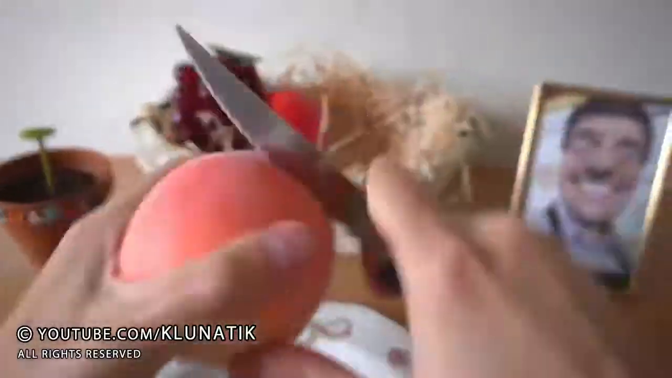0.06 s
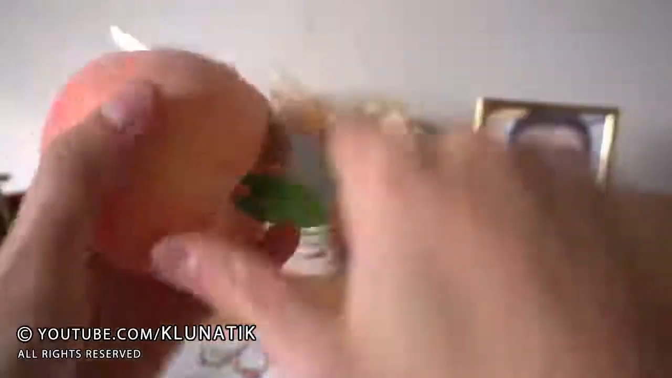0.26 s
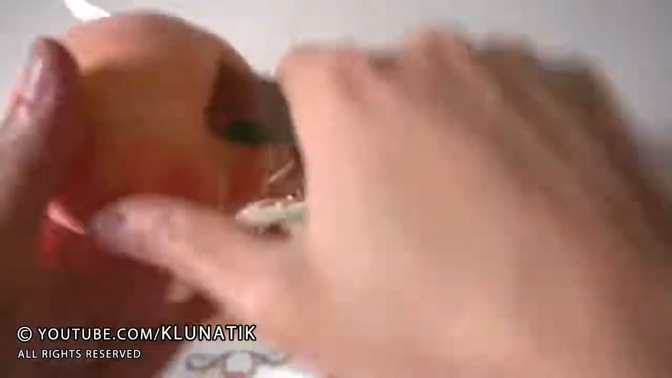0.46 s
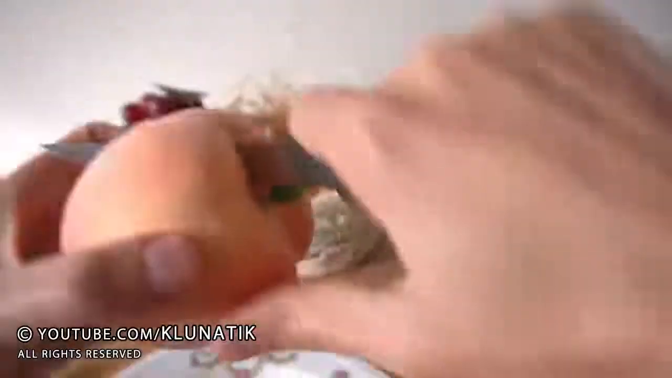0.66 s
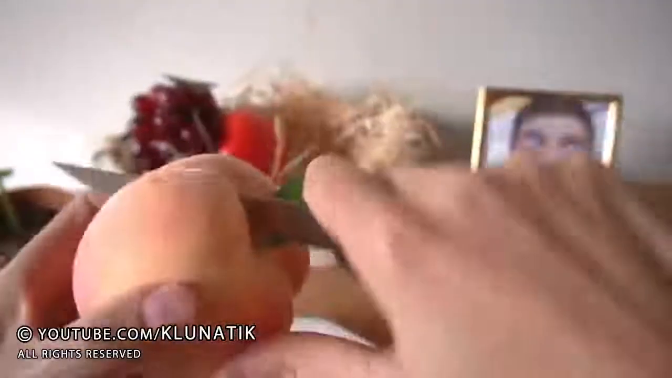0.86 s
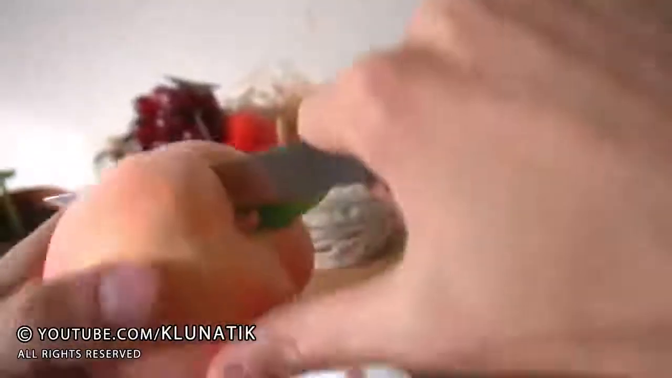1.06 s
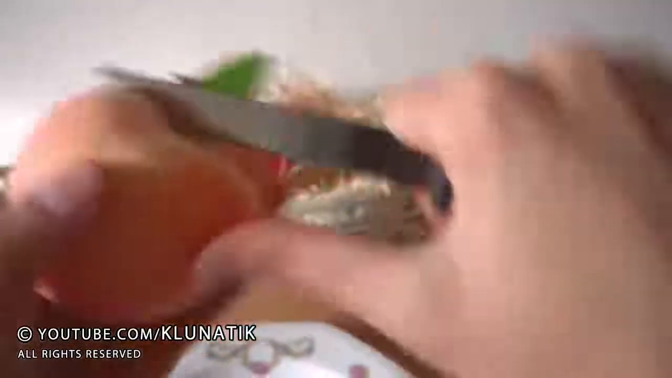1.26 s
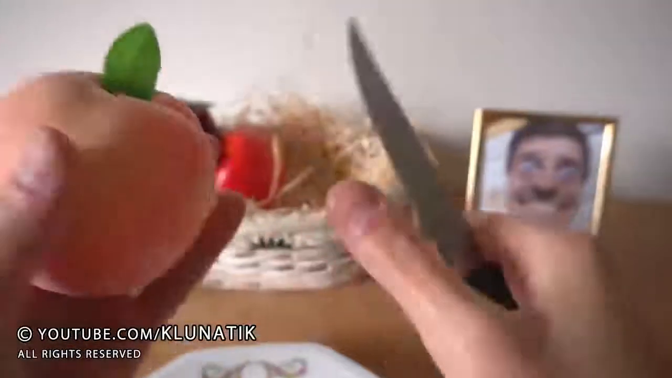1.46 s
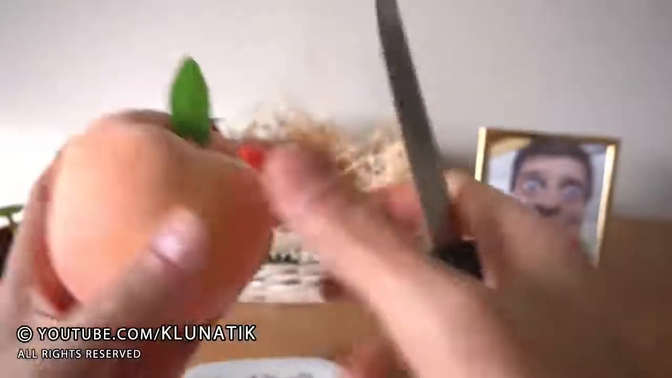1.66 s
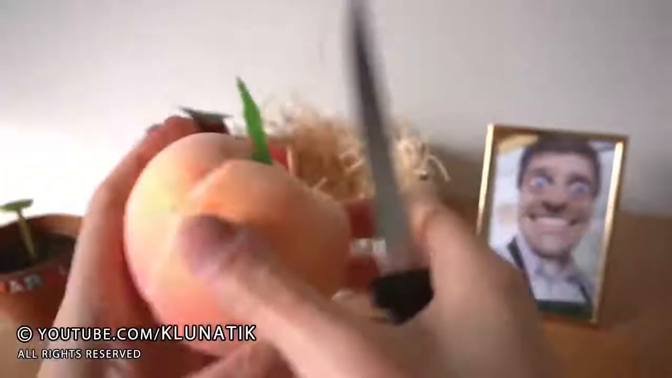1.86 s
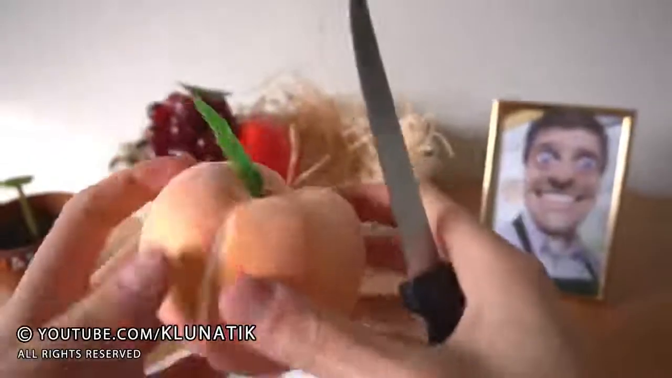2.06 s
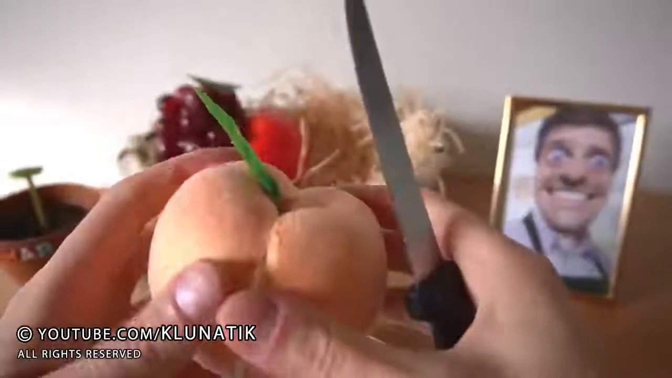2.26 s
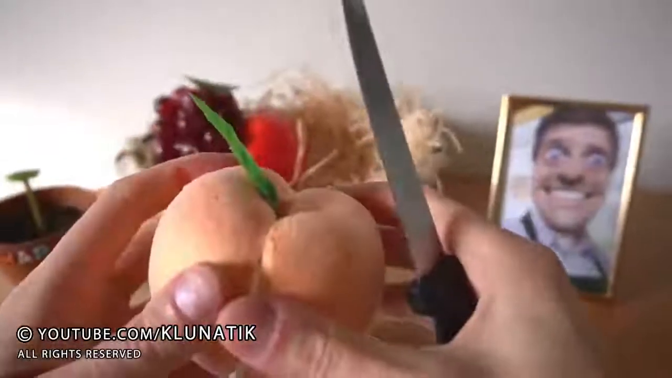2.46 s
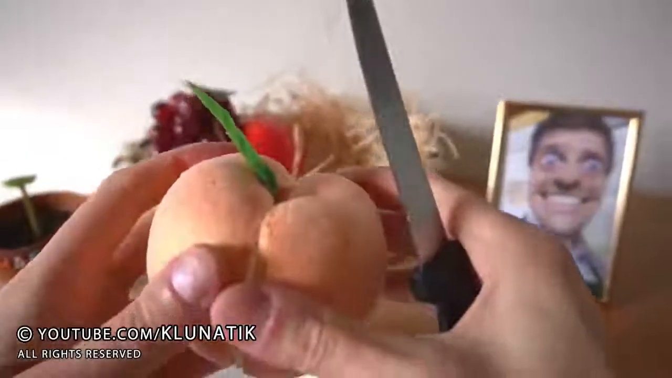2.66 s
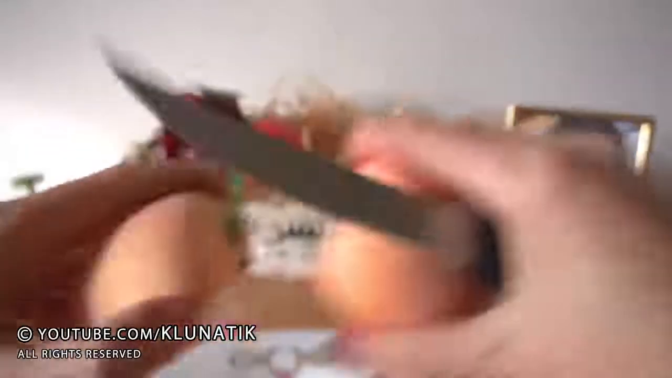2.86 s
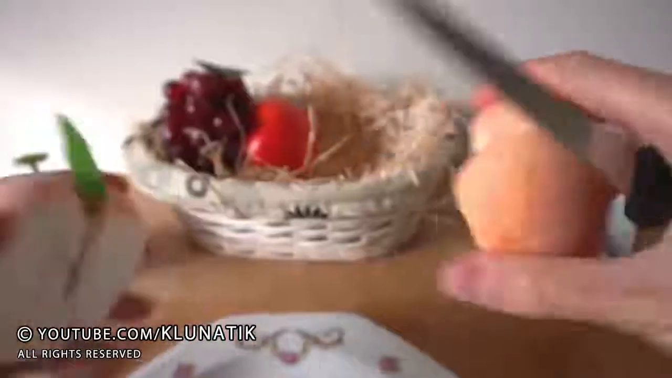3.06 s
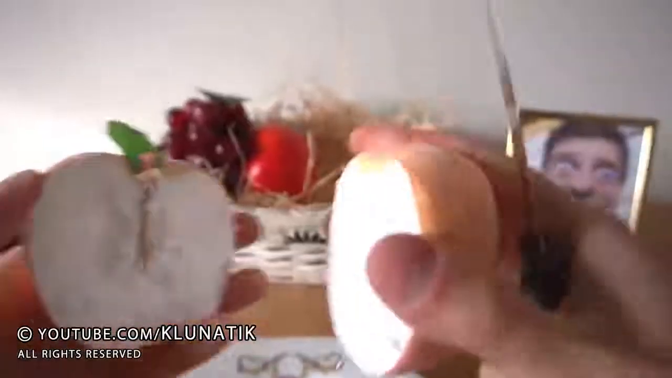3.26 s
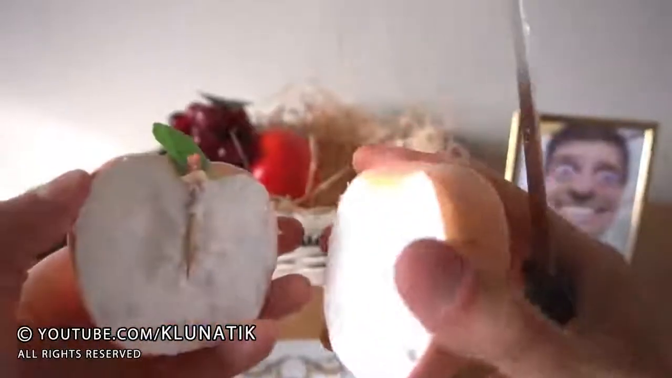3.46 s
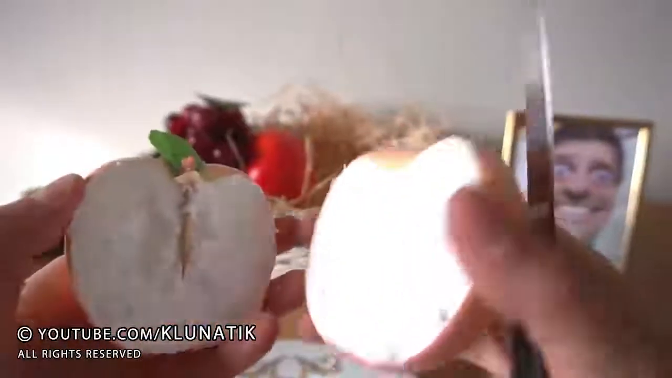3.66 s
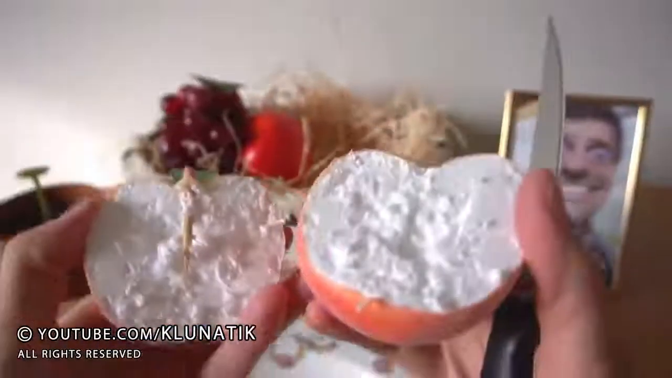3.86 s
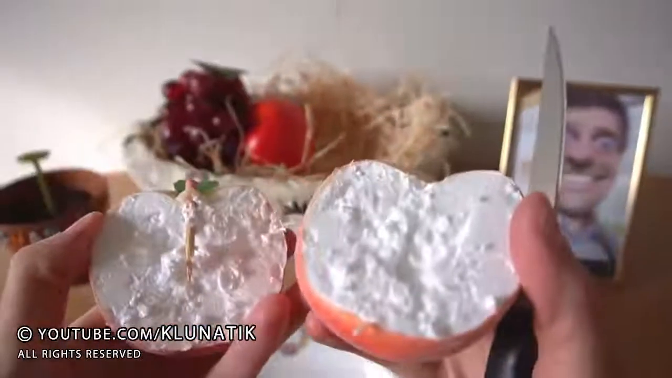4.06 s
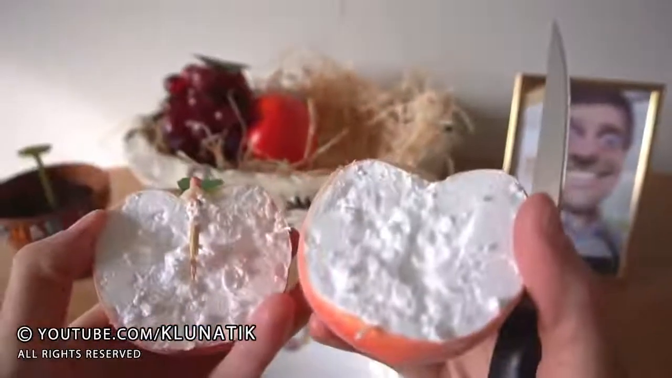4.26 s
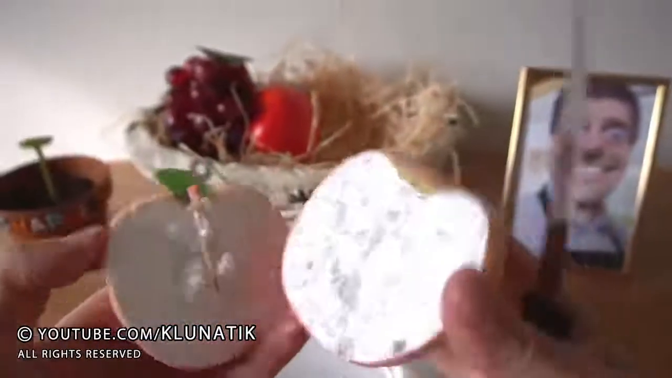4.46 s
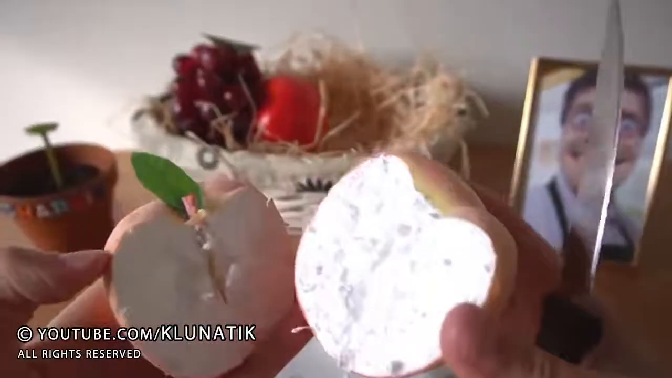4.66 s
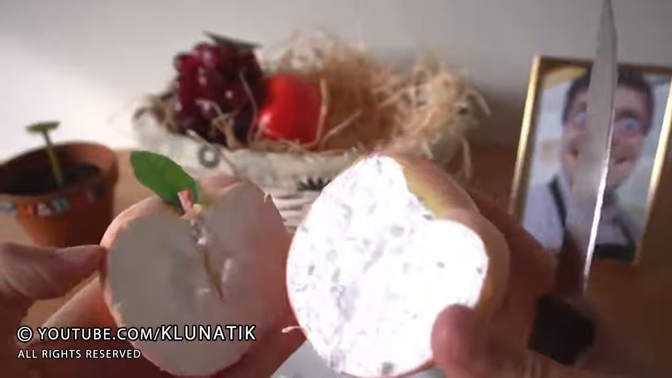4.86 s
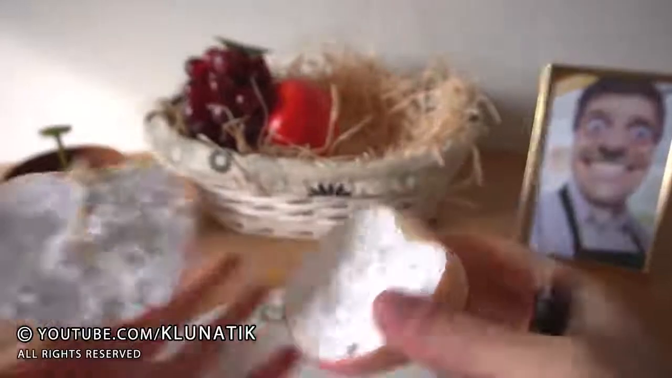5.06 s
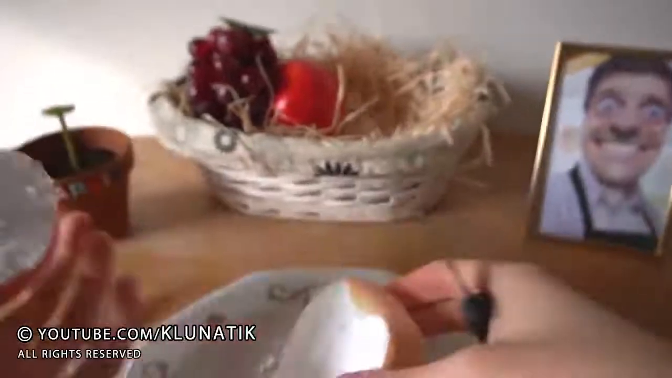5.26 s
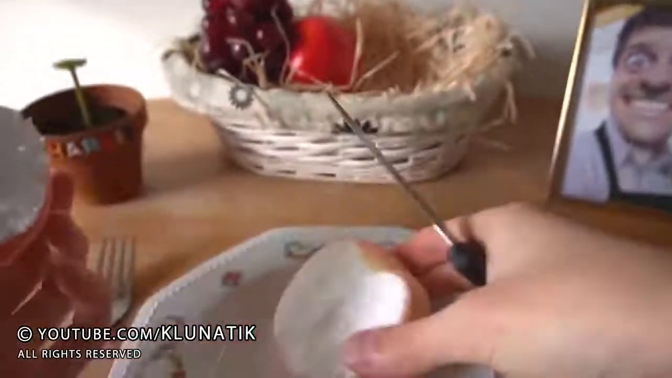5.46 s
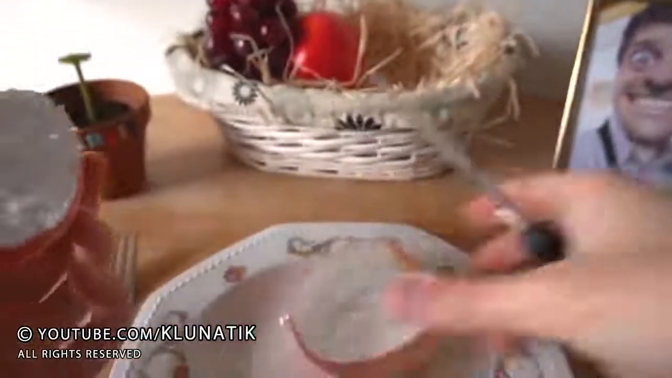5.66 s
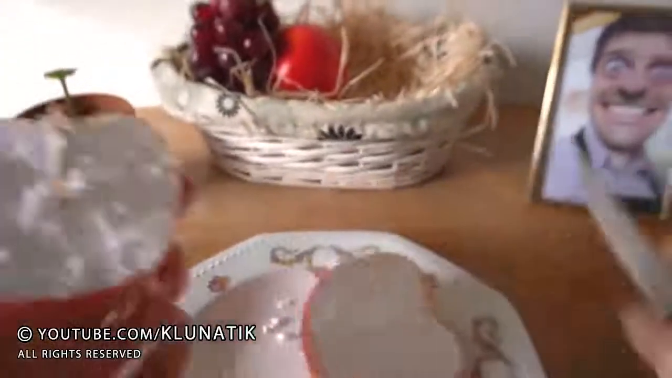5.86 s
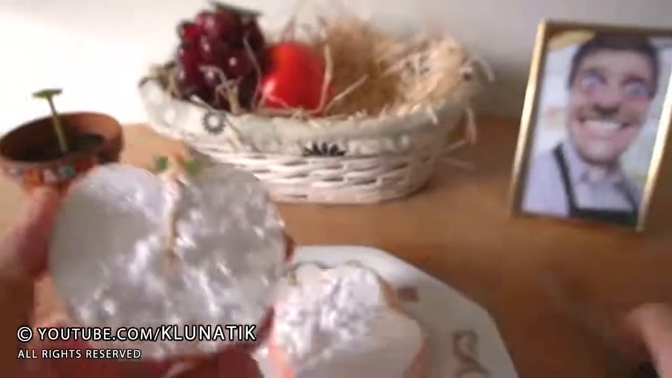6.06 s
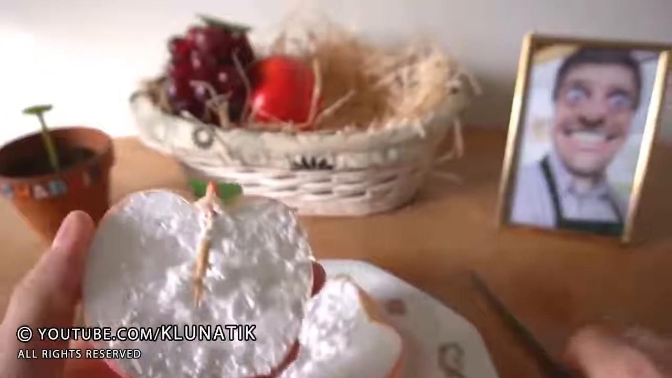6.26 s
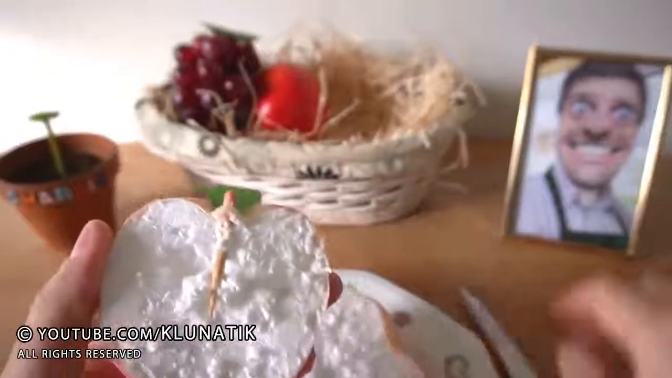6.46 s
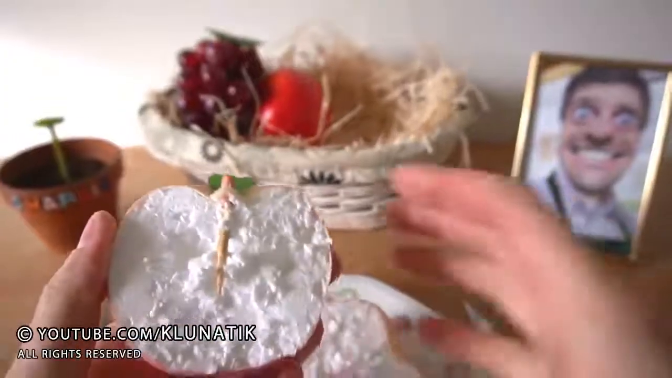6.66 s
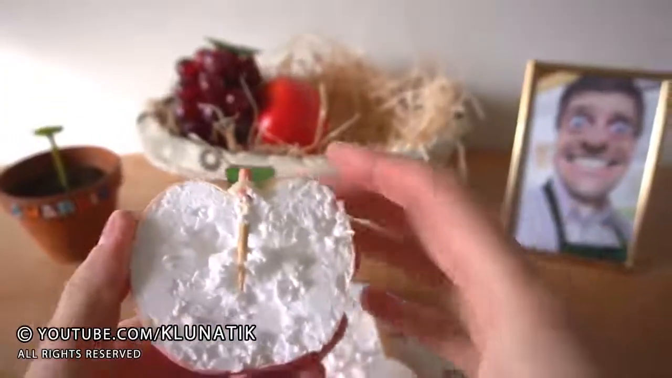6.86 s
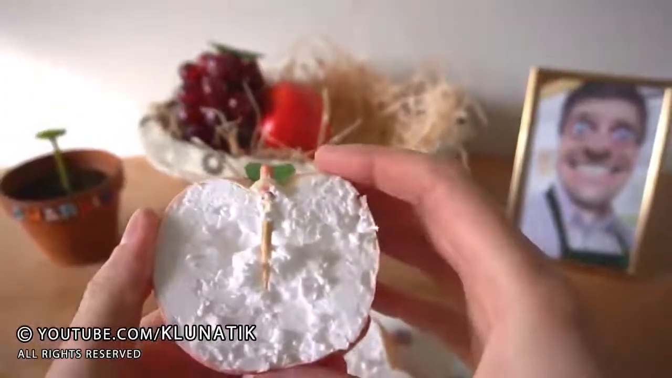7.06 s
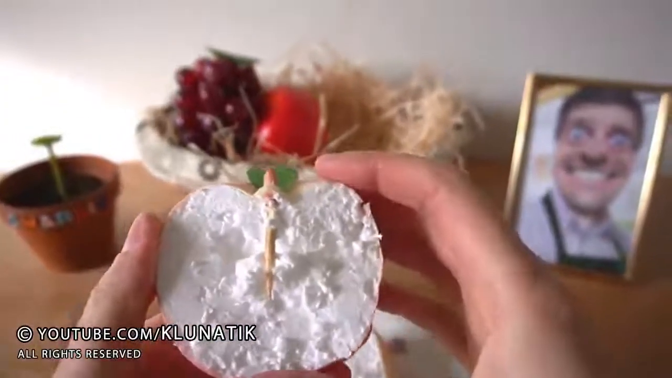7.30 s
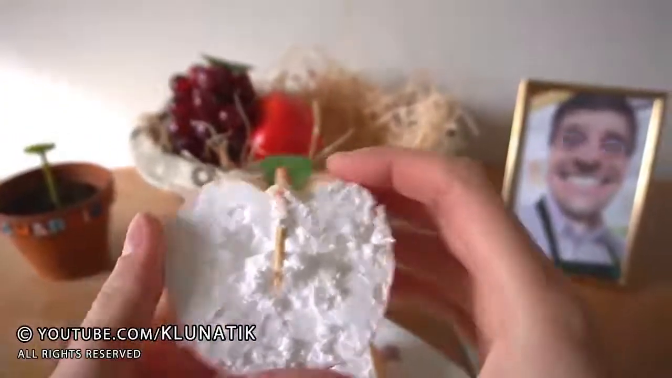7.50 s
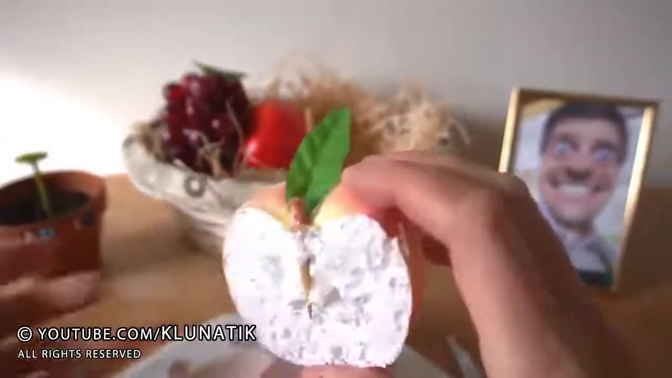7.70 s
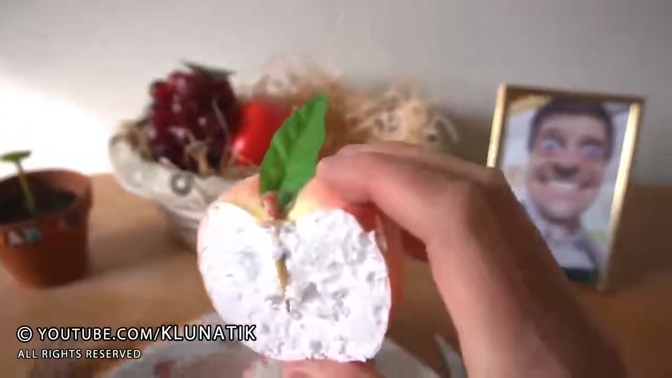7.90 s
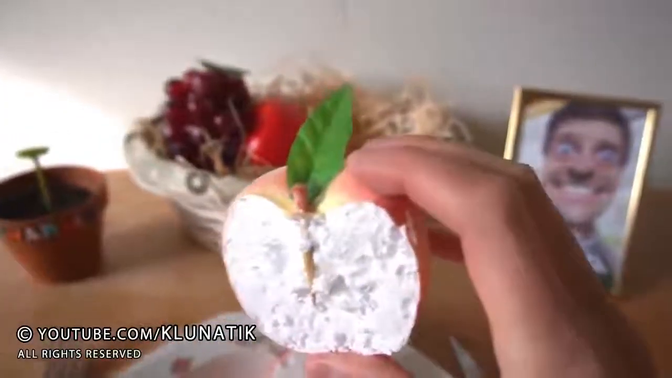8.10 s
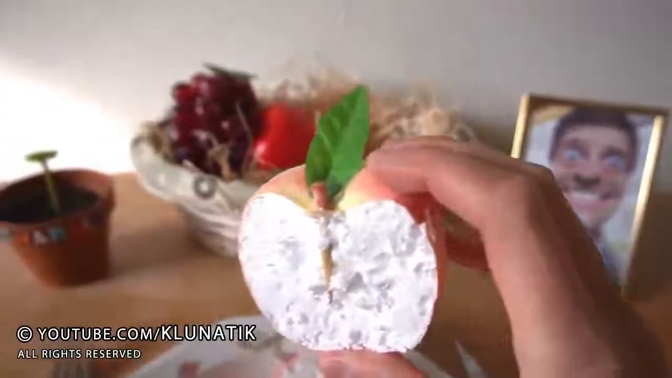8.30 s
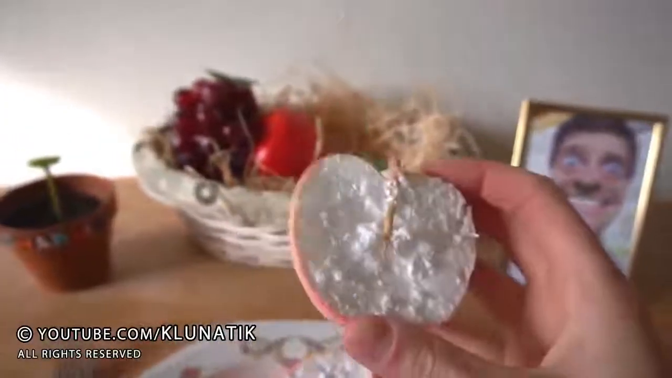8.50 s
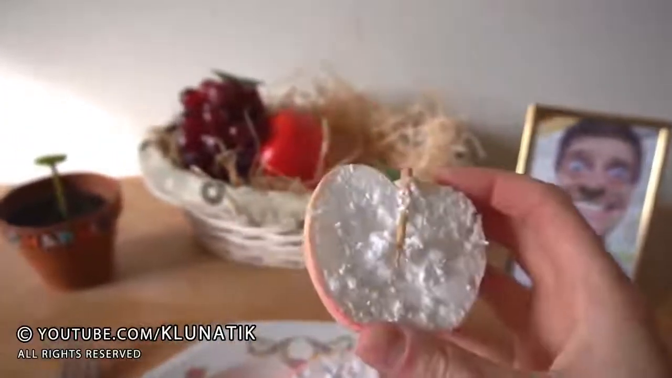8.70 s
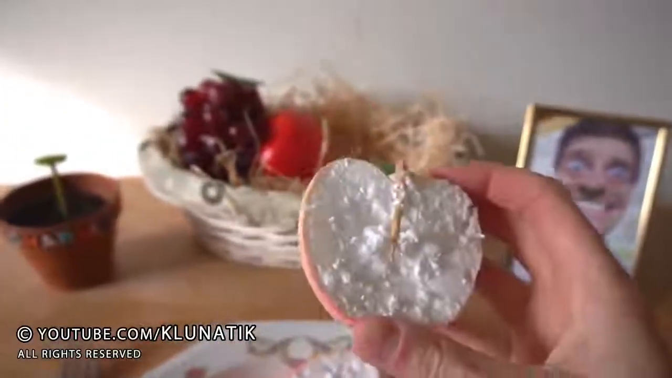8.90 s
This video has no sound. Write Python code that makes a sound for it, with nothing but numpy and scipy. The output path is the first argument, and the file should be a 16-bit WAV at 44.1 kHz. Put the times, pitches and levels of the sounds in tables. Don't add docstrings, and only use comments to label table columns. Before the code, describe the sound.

A knife saws through a dry foam fruit with scratches, squeaky rubs and sharp snaps; halves crack apart, then the knife clatters onto a wooden table.

```python
import sys
import numpy as np
from scipy import signal
from scipy.fft import rfft, irfft, next_fast_len
from scipy.io import wavfile
from scipy.ndimage import uniform_filter1d

SR = 44100
rng = np.random.default_rng(int(sys.argv[2]) if len(sys.argv) > 2 else 0)


def ratio(d):
    e = np.asarray(d, float) / 20
    return 10 ** e


def put_to_file(sound):
    columns = np.atleast_2d(sound).T
    safe = np.clip(columns, -1, 1)
    whole_steps = np.round(safe * 32767)
    wavfile.write(sys.argv[1], SR, whole_steps.astype(np.int16))


N = 394244


def evened(x):
    return x / np.sqrt(np.mean(x ** 2) + 1e-20)


def filtered(x, order, hz, kind="low"):
    return signal.sosfilt(signal.butter(order, hz, kind, fs=SR, output="sos"), x)


def filtered_both_ways(x, order, hz):
    return signal.sosfiltfilt(signal.butter(order, hz, "high", fs=SR, output="sos"), x)


def read(points, hz):
    f, value = np.transpose(points)
    return np.interp(np.log(hz + 1), np.log(f + 1), value)


def add(mix, s, sound, pan_db=0):
    part = mix[:, max(round(s * SR), 0):][:, :len(sound)]
    gains = ratio(np.array([[.5], [-.5]]) * pan_db)
    part += (gains * sound)[:, :part.shape[1]]


def ring(x, hz, width):
    pole = np.exp((2j * np.pi * hz - np.pi * width) / SR)
    gain = 2 * (1 - abs(pole))
    return gain * signal.lfilter([1, -pole.real], [1, -2 * pole.real, abs(pole) ** 2], x)


def body(x, modes):
    return evened(sum(ratio(db) * evened(ring(ring(x, hz, w), hz, w)) for hz, w, db in modes))


def colour(x, points):
    size = next_fast_len(len(x))
    gains = ratio(read(points, np.fft.rfftfreq(size, 1 / SR)))
    return evened(irfft(rfft(x, size) * gains, size)[:len(x)])


def grains(length, per_s, spread_db):
    size = ratio(spread_db * np.minimum(rng.exponential(1, length), 5))
    return size * rng.standard_normal(length) * (rng.random(length) < per_s / SR)


def wandering(shape, bins, frames):
    noise = rng.standard_normal(shape)
    return evened(uniform_filter1d(uniform_filter1d(noise, bins, 0), frames, 1))


def mottle(x, depth_db, bins, frames):
    z = signal.stft(x, nperseg=256)[2]
    return signal.istft(z * ratio(depth_db * wandering(z.shape, bins, frames)), nperseg=256)[1][:len(x)]


def swells(rows):
    t = np.arange(0, N / SR + .002, .001)
    s, db, rise, hold, fall = np.transpose(rows)[:, :, None]
    before = np.maximum(s - t, 0) / np.maximum(rise, .001)
    after = np.maximum(t - s - hold, 0) / np.maximum(fall, .001)
    power = (ratio(db - 20 * (before + after)) ** 2).sum(0)
    return np.interp(np.arange(N) / SR, t, 10 * np.log10(power + 1e-14))


# time in seconds, left over right in dB.
HAND_PAN = [
    (0.0, 0.5),
    (0.32, 2),
    (0.86, 1),
    (1.75, 3),
    (2.6, 1),
    (5.7, -1),
    (5.85, 7.5),
    (6.1, -3),
    (7.75, 0),
]
# frequency in Hz, level in dB per Hz.
FOAM_COLOUR = [(710, -35), (1300, -16), (1940, -2.5), (2700, -2.5), (4560, -3.5), (7000, -12),
               (9100, -13.5), (15400, -41)]
# frequency in Hz, level in dB per Hz.
FIZZ_COLOUR = [(3240, -30), (5500, -11), (5900, -9.5), (13000, -9), (15000, -12), (15500, -12.5)]
# frequency in Hz, width in Hz, level in dB.
RUB_BODY = [(315.7, 200, -16.5), (586, 506, -4), (930, 1500, -1)]
# start in seconds, scratch in dB, rise, hold and fall in seconds.
SAWING_STROKES = [(0, -42.5, .01, 0.012, 0.304), (.086, -19.5, .006, 0.014, 0.048),
                  (.14, -32.5, .03, .03, .06), (.215, -33.5, .05, .04, .1), (.3, -36, 0.11, 0.09, 0.19),
                  (.45, -41.5, 0.16, 0.18, 0.17), (.74, -33.5, 0.018, 0.043, 0.15),
                  (.965, -41, 0.018, .01, .1), (.985, -38.5, .04, .02, .2), (1.07, -42, 0.045, 0.15, 0.26),
                  (1.21, -32.5, .015, 0.027, .1), (1.25, -31.5, .04, .02, .03),
                  (1.274, -24, 0.008, 0.064, 0.024), (1.33, -30.5, 0.017, 0.019, 0.2),
                  (1.55, -50, 0.13, 0.008, 0.3)]
# start in seconds, scratch in dB, rise, hold and fall in seconds.
PRYING_PUSHES = [
    (1.84, -42, 0.01, 0.015, 0.074),
    (1.925, -43, 0.11, 0.036, 0.48),
    (2.128, -41.5, 0.012, 0.036, 0.17),
    (2.242, -43, 0.1, 0.028, 0.29),
    (2.396, -43, 0.1, .005, 0.024),
    (2.45, -54, .05, 0.11, 1),
]
# start in seconds, scratch in dB, rise, hold and fall in seconds.
TEARING_PULLS = [
    (2.71, -44.5, 0.015, .03, .15),
    (2.791, -31.5, 0.082, 0.024, .03),
    (2.8, -34, .01, .01, 0.09),
    (2.865, -27.5, 0.03, 0.065, 0.18),
    (2.957, -33.5, 0.037, 0.011, 0.12),
    (3.274, -57, 0.013, 0.0089, 0.052),
]
# start in seconds, scratch in dB, rise, hold and fall in seconds.
HANDLING_TOUCHES = [(3.63, -53, 0.0061, 0.0057, 0.073), (3.721, -47.5, 0.024, 0.032, 0.021),
                    (3.771, -51, 0.017, 0.0053, 0.083), (3.837, -48.5, 0.015, 0.01, 0.14),
                    (4.508, -43, 0.056, 0.0042, 0.042), (4.571, -61, .05, 0.081, 0.16),
                    (5.07, -53.5, 0.012, .005, 0.039), (5.23, -62.5, 0.36, 0.052, 0.08),
                    (5.388, -27.5, 0.016, 0.012, 0.012), (5.5, -49, 0.21, 0.028, 0.2),
                    (5.628, -51.5, 0.015, 0.005, 0.054), (5.867, -56, 0.12, 0.0075, 0.24),
                    (7.044, -50.5, 0.01, 0.0043, 0.1), (7.196, -45, 0.013, 0.028, 0.04),
                    (7.5, -60.5, 0.016, 0.02, 0.09), (7.561, -60.5, 0.071, 0.011, 0.11),
                    (7.649, -62.5, 0.04, 0.01, 0.063)]
# start in seconds, rub in dB, rise, hold and fall in seconds.
PALM_SQUEEZES = [(0, -50.5, .01, 0.076, .2), (.09, -28, 0.019, 0.017, 0.043), (.26, -52, 0.27, 0.034, 0.36),
                 (.42, -44, 0.25, 0.011, 0.032), (.62, -48, 0.23, 0.018, 0.12),
                 (.745, -40.5, 0.035, 0.038, 0.09), (.987, -47.5, 0.23, 0.007, 0.076),
                 (1.1, -51, 0.33, 0.049, .1), (1.21, -36, 0.035, 0.059, 0.12),
                 (1.285, -29, 0.046, 0.0033, 0.022), (1.37, -34.5, 0.044, 0.0073, 0.063),
                 (1.58, -55.5, .15, 0.044, 0.089), (1.95, -57.5, 0.68, 0.026, 1),
                 (2.187, -44, 0.056, 0.0027, 0.0071), (2.42, -51.5, 0.23, 0.046, 0.26),
                 (2.82, -48.5, 0.19, 0.076, 0.34), (3.78, -59.5, 0.62, 0.064, 0.61),
                 (4.508, -50.5, 0.09, 0.0083, 0.077), (5.075, -62, 0.04, .01, 0.43),
                 (5.39, -41, 0.0089, 0.005, 0.01), (5.53, -59.5, 0.61, 0.033, 0.64),
                 (7.045, -54, .02, .01, 0.1), (7.21, -55, 0.095, 0.0074, 0.042)]
# start in seconds, fizz in dB, rise, hold and fall in seconds.
EDGE_SKIDS = [(0.172, -27.5, .002, .006, .05), (0.178, -36, .003, .004, .02), (.44, -37, .02, .003, .03),
              (0.934, -51.5, .002, .002, .01), (0.935, -48, .006, .003, .012),
              (1.069, -39, .002, .006, .06), (1.11, -48.5, .004, .006, .03),
              (1.3, -32, .003, 0.005, 0.0098), (1.335, -45, 0.0036, 0.0032, 0.0077),
              (1.374, -39, .002, .004, 0.019), (1.441, -44, .01, .008, 0.013),
              (1.55, -45, .003, 0.0037, .008), (0.636, -52, .01, .004, .02), (2.715, -44, .002, .01, .06),
              (2.737, -44, .003, 0.0039, .02), (7.19, -45, .002, 0.0026, .02)]
FIZZ_SHARE_DB = (-6.5, -6, -12.5, -4)
FIZZ_TILT = (-0.36, -0.24, 0.2, -0.16)


def foam():
    out = np.zeros((2, N))
    gestures = SAWING_STROKES, PRYING_PUSHES, TEARING_PULLS, HANDLING_TOUCHES
    levels_db = [swells(rows) for rows in gestures]
    saw, pry, split, handle = (ratio(db) for db in levels_db)
    fizz = ratio(swells(EDGE_SKIDS))
    for db, share_db, slope in zip(levels_db, FIZZ_SHARE_DB, FIZZ_TILT):
        fizz = fizz + ratio(db + share_db + slope * (db + 40.5))
    clumps = ratio(1.1 * evened(uniform_filter1d(rng.standard_normal(N), 300)))
    tear = mottle(grains(N, 16000, 0.3) * clumps, 1.2, 30, 3)
    scratch = colour(tear, FOAM_COLOUR)
    thin = filtered(scratch, 4, 1600, "high")
    rub = body(grains(N, 900, 1.5) * clumps, RUB_BODY)
    sound = (saw + pry + handle) * scratch + split * thin
    sound = sound + ratio(swells(PALM_SQUEEZES)) * rub + ratio(2.0) * fizz * colour(tear, FIZZ_COLOUR)
    add(out, 0, ratio(-5.0) * sound, np.interp(np.arange(N) / SR, *np.transpose(HAND_PAN)))
    return out


# frequency in Hz, level in dB per Hz.
HUSH_COLOUR = [(15, -41.5), (30, -14.5), (117, -5), (160, -9.5), (350, -13.5), (800, -19), (15000, -36),
               (16000, -52)]
# frequency in Hz, left-right likeness from -1 to 1.
HUSH_LIKENESS = [(60, 0.45), (240, -0.71), (950, -0.33), (3770, -0.24), (15000, 0.69)]


def hush():
    level_db = -58
    frames, hz = N // 256 + 5, np.fft.rfftfreq(1024, 1 / SR)
    a, b, c, d = rng.standard_normal((4, len(hz), frames))
    same, left = np.clip(read(HUSH_LIKENESS, hz), -1, 1)[:, None], a + 1j * b
    z = np.array([left, same * left + np.sqrt(1 - same ** 2) * (c + 1j * d)])
    z *= ratio(read(HUSH_COLOUR, hz)[:, None] + 0.8 * wandering(a.shape, 8, 20))
    return ratio(level_db) * evened(signal.istft(z, nperseg=1024, noverlap=768)[1][:, :N])


# start in seconds, peak in dB, thud in Hz.
FRUIT_THUDS = [(.084, -34.5, 330), (.095, -16, 695), (.112, -25, 600), (.14, -24.5, 680),
               (.152, -25.5, 520), (0.211, -34.5, 377), (.27, -53, 668), (.293, -37, 608),
               (0.375, -44, 514), (0.606, -36, 890), (0.761, -22, 1230), (.785, -37, 520),
               (1.07, -42.5, 315), (1.116, -36.5, 610), (1.198, -40, 400), (1.223, -24.5, 300),
               (1.234, -33, 400), (1.275, -26.5, 368), (1.29, -33, 397), (1.313, -27, 543),
               (1.325, -19, 570), (1.342, -26.5, 550), (1.368, -19.5, 557)]


def thuds():
    width_hz, t60_s = 200, 0.018
    out, t = np.zeros((2, N)), np.arange(3000) / SR
    for s, db, hz in FRUIT_THUDS:
        push = rng.standard_normal(len(t)) * ratio(-60 * t / t60_s) + 8.0 * (t == 0)
        thud = body(push, [(hz, width_hz * hz / 500, 0), (1.5 * hz, 2 * width_hz, -12)])
        add(out, s, ratio(db - 4.0) * thud / abs(thud).max(), np.interp(s, *np.transpose(HAND_PAN)))
    return out


# start in seconds, peak in dB, ring in Hz,
# relative treble in dB.
BEAD_SNAPS = [(0.0907, -9.5, 4020, -20), (0.1, -17, 2100, -14), (0.44, -21, 2200, 1),
              (0.9406, -31.5, 4000, -12), (0.605, -30.5, 1250, -20), (1.528, -35, 3000, -20),
              (1.2255, -25.5, 2600, -15), (0.7515, -26.5, 1660, -19), (0.7616, -26.5, 2000, -13.5),
              (.8635, -33, 6000, -10), (0.357, -20, 6500, -5), (.3712, -22, 5000, -3),
              (0.451, -27, 7000, -10), (1.198, -25, 2750, -6), (1.0675, -30, 5530, 4.5),
              (1.2163, -17.5, 2500, -31), (1.233, -21, 2700, -11), (1.2735, -10.5, 2100, -22),
              (1.278, -6, 2350, -11), (1.2811, -11, 2300, -8), (1.293, -10, 2800, -19),
              (1.301, -10.5, 1770, 3.5), (1.307, -12.5, 1700, -23.5), (1.32, -14, 1810, -23),
              (1.368, -18.5, 2200, -27), (1.571, -31, 4600, -25),
              (1.831, -31, 2240, -20), (2.38, -32, 2400, -20), (2.784, -16.5, 3500, 9),
                (2.8158, -15.5, 4020, -4), (2.89, -17, 4030, -8), (2.52, -35.5, 3050, -6),
                (2.465, -40, 4000, 5), (2.583, -34, 5300, 15), (2.651, -29.5, 4970, 6),
                (2.715, -29, 3350, -6), (3.629, -41, 4750, -3), (3.708, -38, 4700, -19),
                (3.7839, -23.5, 5130, -12), (3.843, -26.5, 4300, 23), (4.4986, -32.5, 4380, -15),
                (5.0722, -38.5, 4800, -29), (5.352, -35, 2380, 10), (5.3858, -17, 2610, -16),
                (5.5485, -34.5, 2150, -15), (5.864, -33.5, 5300, 36), (7.045, -31, 2410, 0),
                (7.129, -41, 4400, 12), (7.497, -48, 2680, 2), (7.5542, -47, 5000, -15)]
# start in seconds, peak in dB, ring in Hz, relative treble in dB, t60 of splinters in seconds.
SHARP_CRACKS = [(.2607, -8, 3170, -6, .011), (.3488, -3.5, 2300, -2, .011), (.7108, -24, 2200, -13, .008),
                (.7412, -20, 2400, -20, .006), (1.6908, -23, 3600, 2, .008), (2.5545, -24, 6500, 0, .01),
                (2.6765, -30, 3600, -4, .008), (2.8075, -24, 900, 8, .01), (2.8077, -11, 3400, 4, .012),
                (2.8098, -12, 5200, 0, .01), (2.883, -3, 2800, 8, .008), (2.9088, -10, 2500, 6, .014),
                (2.9105, -14, 5000, 0, .01)]


def snaps():
    splinter_t60_s = .02
    lead = 40
    out, t = np.zeros((2, N)), np.arange(1500) / SR
    beads = [(*row, splinter_t60_s) for row in BEAD_SNAPS]
    for s, db, hz, treble_db, t60 in [*SHARP_CRACKS, *beads]:
        burst = rng.standard_normal(len(t)) * ratio(-60 * t / max(t60, .003)) + 4.0 * (t == 0)
        burst = filtered_both_ways(np.pad(burst, (lead, 0)), 3, .7 * hz)
        low = ring(ring(burst, hz, .7 * hz), hz, .7 * hz)
        high = filtered(burst, 1, 9000)
        sound = low / abs(low).max() + ratio(treble_db + 7) * high / abs(high).max()
        pan_db = np.interp(s, *np.transpose(HAND_PAN))
        add(out, s - lead / SR, ratio(db) * sound / abs(sound).max(), pan_db)
    return out


# frequency in Hz, width in Hz, level in dB.
TABLE_BOOM = [(128.3, 13, -2.5), (169, 14, -4), (239.6, 16, -8)]
# start in seconds, level in dB, rise, hold and fall in seconds.
TABLE_BUMPS = [
    (1.92, -51, 0.0087, 0.014, 0.04),
    (2.44, -62.5, 0.088, 0.035, 0.73),
    (5.38, -60, 0.063, 0.057, .2),
    (5.63, -56, 0.58, 0.019, 0.15),
    (5.92, -65.5, 0.096, 0.0084, 0.046),
]


def bumps():
    push = rng.standard_normal(N)
    sound = body(push, TABLE_BOOM) + 1.4 * body(push, [(85.5, 120, 9.0), (172.4, 180, -3.5)])
    return ratio(swells(TABLE_BUMPS) - 4.5) * sound * np.ones((2, 1))


# time in seconds, level in dB.
CREAK_LEVEL = [
    (2.372, -64),
    (2.39, -37),
    (2.41, -38),
    (2.445, -39),
    (2.48, -43.5),
    (2.52, -43.5),
    (2.58, -55),
    (2.61, -63),
    (2.7, -61),
]
# frequency in Hz, width in Hz, level in dB.
CREAK_MODES = [(773, 22, -3.5), (1660, 41, 0), (608, 61, -11.5), (1210, 25, -7.5), (1284, 40, -4.5),
               (1554, 75, 2.5), (1813, 30, -5), (3000, 80, -12)]
CREAK_DAMPING = (0.1, 14, 57, 58, 50, 45, 50, 30)


def creak():
    out = np.zeros((2, N))
    s, db = np.transpose(CREAK_LEVEL)
    at = np.arange(s[0], s[-1], 1 / SR)
    slips, t = grains(len(at), 4000, .6), np.arange(len(at)) / SR
    sound = sum(ratio(mode[2] - 8.5 - fade * t) * body(slips, [mode])
                for mode, fade in zip(CREAK_MODES, CREAK_DAMPING))
    add(out, s[0], ratio(np.interp(at, s, db)) * sound)
    return out


# start in seconds, peak in dB, knock in Hz.
KNIFE_BLOWS = [(6.0062, -16, 2900), (6.182, -13, 560), (6.213, -18.5, 589), (6.230, -4, 1560),
               (6.232, -15, 742), (6.309, -15, 1574), (6.312, -20, 939), (6.357, -20, 1258),
               (6.4615, -14.5, 1476), (6.262, -17.5, 1314), (6.308, -14.5, 600), (6.342, -18.5, 555),
               (6.461, -12.5, 882), (6.469, -5.5, 561), (6.5, -9, 566), (6.502, -18, 1961),
               (6.524, -8.5, 1455), (6.527, -17, 2676), (6.53, -6.5, 610), (6.543, -4.5, 1440),
               (6.556, -11, 605), (6.564, -14, 2920), (6.586, -6, 1720), (6.603, -7, 936),
               (6.603, -7, 2400), (6.628, -13, 1300), (6.633, -12.5, 620), (6.645, -8.5, 1286),
               (6.687, -9.5, 614), (6.721, -15, 1100)]
# start in seconds, peak above 5 kHz in dB.
BLADE_TICKS = [
    (6.004, -28.5),
    (6.228, -37.5),
    (6.475, -17.5),
    (6.481, -24.5),
    (6.5597, -7.5),
    (6.621, -16),
    (6.687, -21.5),
]
# frequency in Hz, width in Hz, level in dB.
BLADE_MODES = [(5170, 1100, -6), (7700, 640, 0.5), (9010, 400, -4), (10710, 1200, -2.5), (12100, 500, -3.5),
               (14000, 1200, -7.5)]


def knocks():
    out, t = np.zeros((2, N)), np.arange(12000) / SR
    for s, db, hz in KNIFE_BLOWS:
        burst = rng.standard_normal(len(t)) * ratio(-60 * t / .012) + 8.0 * (t == 0)
        burst = filtered(burst, 3, 4600)
        modes = [(hz, 360 + 0.062 * hz, 0), (1.5 * hz, 700, -12), (570, 90, -9), (950, 160, -17)]
        knock, thump = body(burst, modes), body(burst, TABLE_BOOM)
        sound = knock / abs(knock).max() + ratio(-25) * thump / abs(thump).max()
        add(out, s, ratio(db - 3.0) * sound, -1.2)
    for s, db in BLADE_TICKS:
        tick = body(rng.standard_normal(1500) * ratio(-60 * t[:1500] / .014), BLADE_MODES)
        add(out, s, ratio(db - 7.0) * tick / abs(tick).max(), -1.2)
    return out


# start in seconds, chatter in seconds, handle in dB, wood in dB, boom in dB.
KNIFE_DROPS = [
    (6.006, 0.11, -18, -21, -29.5),
    (6.183, 0.01, -40, -28.5, -25.5),
    (6.23, 0.074, -24.5, -27.5, -27),
    (6.461, 0.0074, -20, -16.5, -30),
    (6.468, 0.23, -13, -18, -26.5),
]
BLADE_SHARE_DB = (-10, -10, -17, -29.5, -19.5)
LANDING_DB = (3.5, 4.5, 9, 6, -1.5)
DIE_AWAY = (81.1, 330, 199.8, 200)
# frequency in Hz, width in Hz, level in dB.
WOOD_MODES = [(310, 110, -17), (430, 120, -9), (550, 30, -1.5), (590, 45, -3), (655, 60, -5), (725, 70, -5),
              (820, 110, -5), (913, 50, -8), (955, 50, -8), (1015, 50, -10), (1090, 90, -9), (1240, 70, -8),
              (1440, 100, -7)]
# frequency in Hz, level in dB per Hz.
KNIFE_COLOURS = [
    [(590, -42.5), (1150, -14), (1900, 3.5), (3050, -2), (3600, -13.5), (4640, -11.5), (8740, -30),
     (13000, -45.5)],
    [(590, -11.5), (1310, -0.5), (1820, 5), (2390, -13), (2770, -11), (3360, -30.5), (3870, -24.5),
     (13000, -52.5)],
    [(590, -23), (1000, -9), (1440, -7.5), (2990, -18), (4640, -28), (6680, -25), (9630, -26.5),
     (13000, -33)],
]


def knife():
    split_hz, impact_s, sag_db_per_s = 3600, .012, 30
    lead = 8000
    out, t = np.zeros((2, N)), np.arange(30000) / SR
    first, middle, last = KNIFE_COLOURS
    colours = [first, middle, middle, middle, last]
    for drop, blade_db, impact_db, points in zip(KNIFE_DROPS, BLADE_SHARE_DB, LANDING_DB, colours):
        s, busy_s, handle_db, wood_db, boom_db = drop
        chatter = grains(len(t) + lead, 6000, 1.1)
        chatter = mottle(chatter, 2.5, 2, 8)
        upper = colour(chatter, points)
        handle, blade = [evened(filtered(upper, 4, split_hz, kind)) for kind in ("low", "high")]
        parts = body(chatter, TABLE_BOOM), body(chatter, WOOD_MODES), handle, blade
        levels_db = boom_db, wood_db, handle_db, handle_db + blade_db
        effort_db = impact_db * np.exp(-t / impact_s) - sag_db_per_s * np.minimum(t, busy_s)
        rest_s = np.maximum(t - busy_s, 0)
        sound = sum(ratio(db - 7.5 + effort_db - die * rest_s) * part[lead:]
                    for db, die, part in zip(levels_db, DIE_AWAY, parts))
        add(out, s, sound * np.minimum(t / .003, 1), -1.2)
    return out


# start in seconds, peak in dB, rise, hold and fall in seconds.
TABLE_HUMS = [
    (6.1, -31.5, 0.087, 0.033, .1),
    (6.27, -33.5, .04, 0.023, 0.2),
    (6.48, -28.5, .02, 0.075, .1),
    (6.701, -28, 0.037, 0.03, 0.27),
]


def hum():
    return ratio(swells(TABLE_HUMS)) * np.sin(2 * np.pi * 107.5 * np.arange(N) / SR)


def scatter(x):
    shape = (3, 2, 1200)
    fade = ratio(-60 * np.arange(1200) / SR / .055)
    taps = rng.standard_normal(shape) * (rng.random(shape) < .3) * fade
    taps = filtered(taps, 1, 2500, "high")
    taps /= np.linalg.norm(taps, axis=2, keepdims=True)
    turn = np.pi * 13 * np.arange(N) / SR
    out = np.zeros((2, N))
    for k in range(3):
        share = np.sqrt(2 / 3) * np.cos(turn + k * np.pi / 3)
        out += signal.oaconvolve(x * share, taps[k], axes=1)[:, :N]
    return out


# frequency in Hz, t60 in seconds.
ROOM_T60 = [(150, 0.58), (700, 0.4), (3000, 0.49), (7000, .32), (12000, 0.14)]


def room(x):
    taps = np.zeros((2, SR))
    at = np.arange(200, SR - 20, 20) + rng.integers(0, 20, (2, (SR - 201) // 20))
    np.put_along_axis(taps, at, rng.choice([-1., 1.], at.shape), 1)
    hz, t, z = signal.stft(taps, SR, nperseg=256)
    same = 1 / (1 + (hz[:, None] / 900) ** 2)
    z[1] = same * z[0] + np.sqrt(1 - same ** 2) * z[1]
    tail = signal.istft(z * ratio(-60 * t / read(ROOM_T60, hz)[:, None]), SR, nperseg=256)[1]
    return signal.fftconvolve(x.mean(0)[None], tail / np.linalg.norm(tail[0]), axes=1)[:, :N]


def scene():
    near = foam() + creak() + thuds()
    cracks = snaps()
    table = knocks() + knife() + bumps()
    aside = ratio(-11) * cracks
    early = scatter(ratio(-1) * (near + table) + aside)
    late = room(ratio(-7.5) * near + aside + ratio(-3.5) * table)
    sources = near + cracks + table + early + late + hum()
    return filtered(sources, 2, 65, "high") + hush()


def top_cut(x):
    return signal.sosfilt(signal.butter(12, 16340, fs=SR, output="sos"), x)


def record(dry):
    mid, side = dry.mean(0), (dry[0] - dry[1]) / 2
    side = filtered_both_ways(side, 1, 300)
    stereo = np.array([mid + side, mid - side])
    limited = signal.oaconvolve(stereo, signal.firwin(151, 15050, fs=SR)[None], "same")
    return top_cut(limited)


dry = scene()
out = record(dry)
put_to_file(out)
```